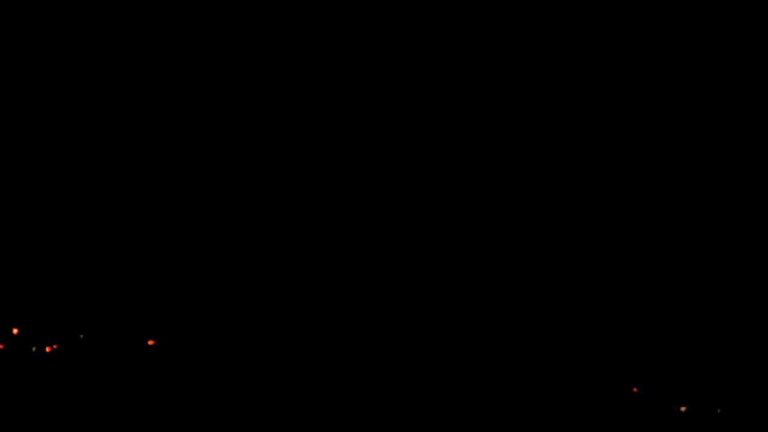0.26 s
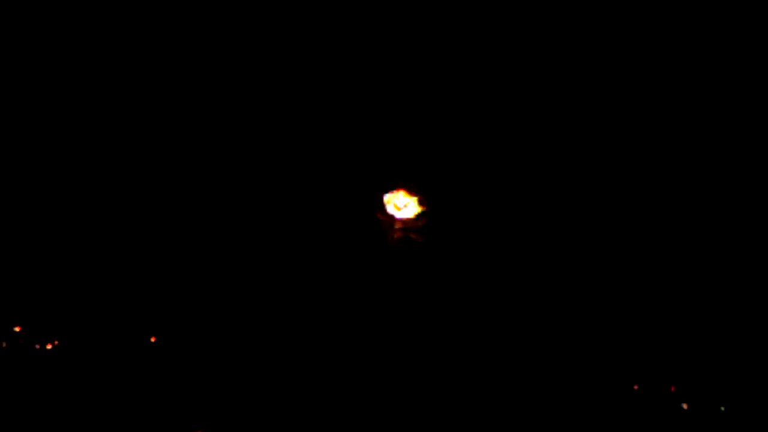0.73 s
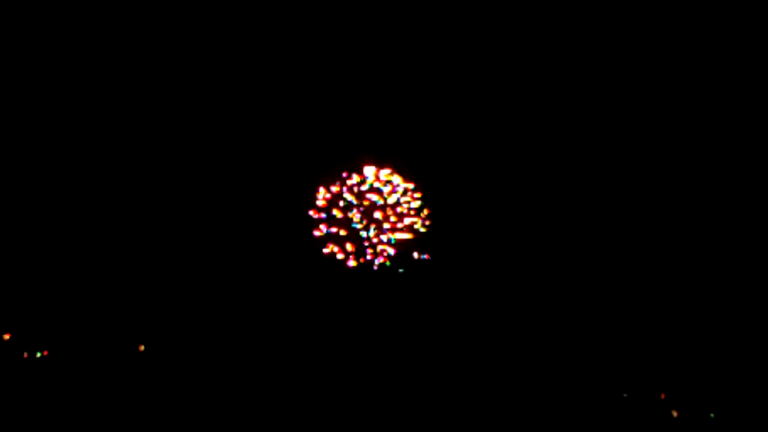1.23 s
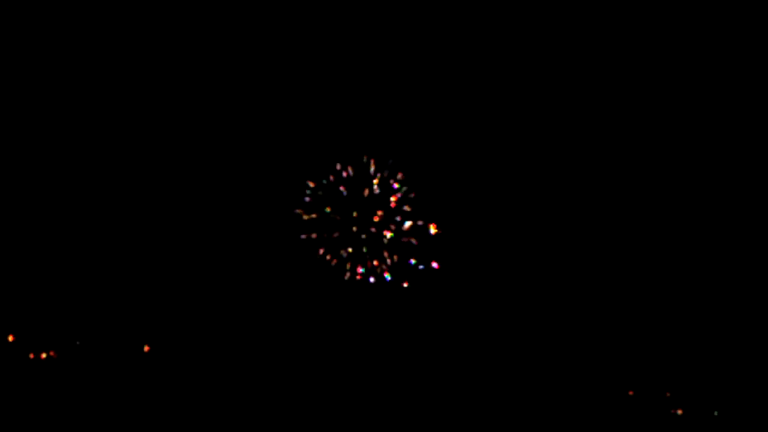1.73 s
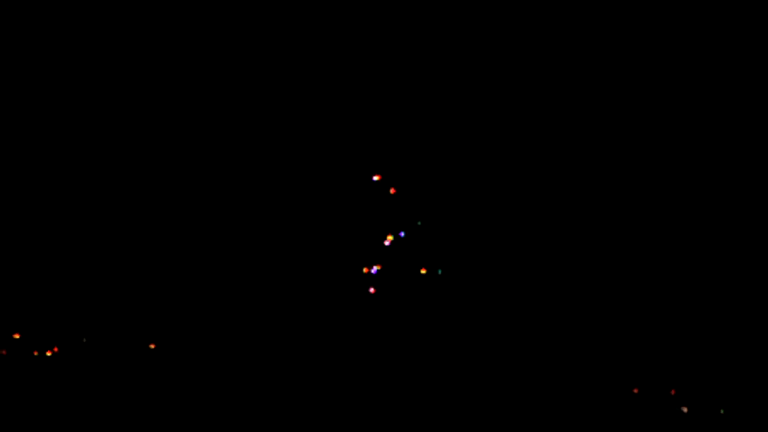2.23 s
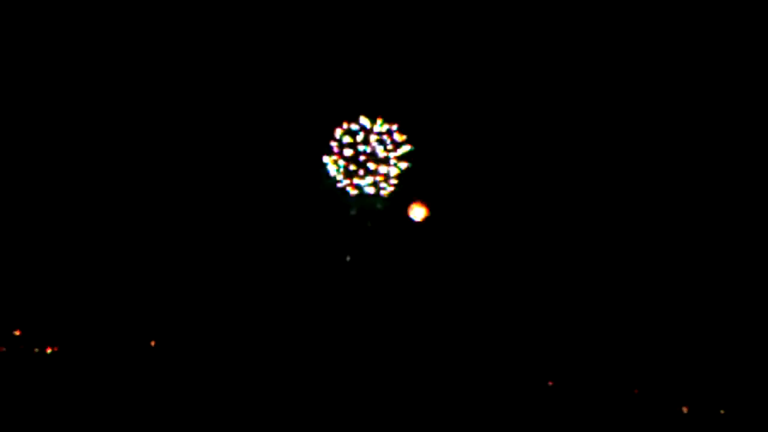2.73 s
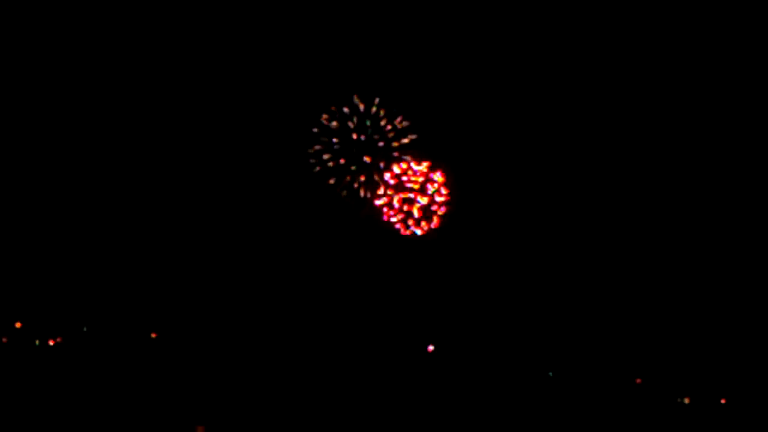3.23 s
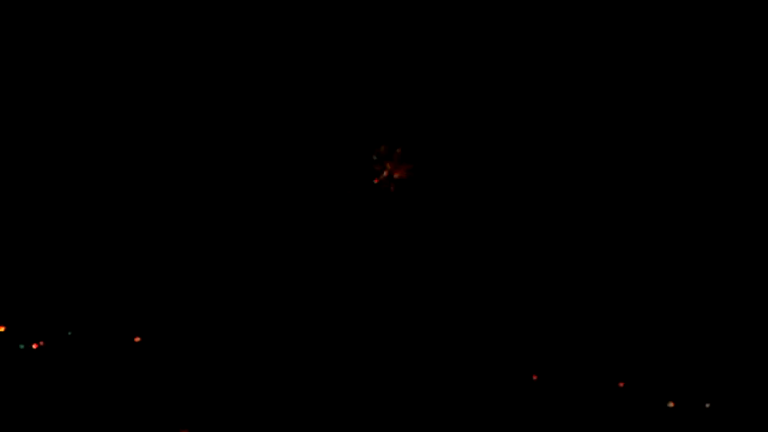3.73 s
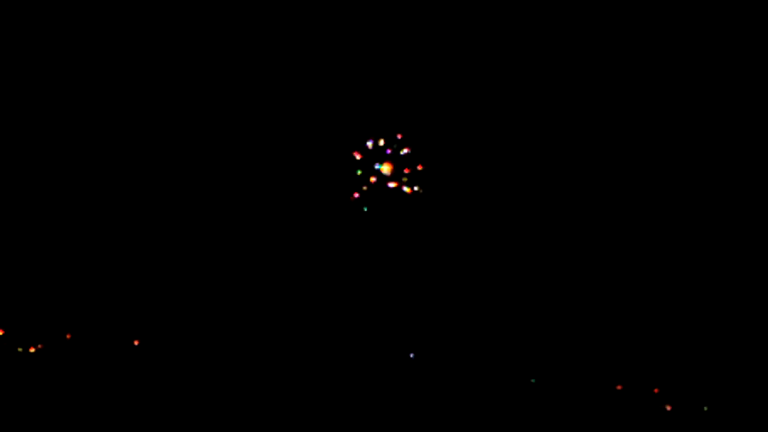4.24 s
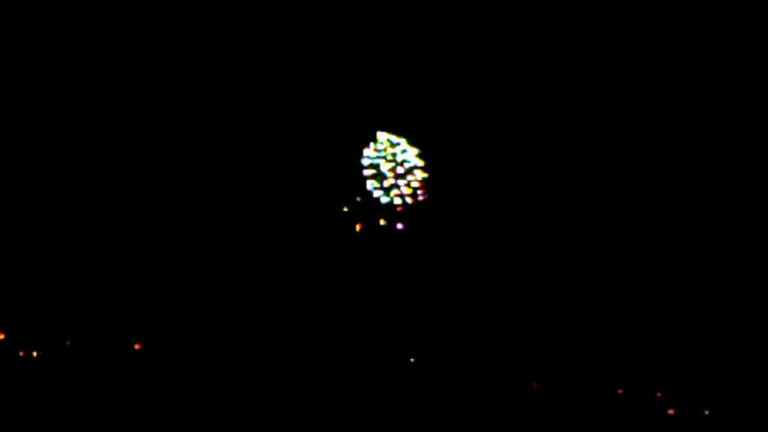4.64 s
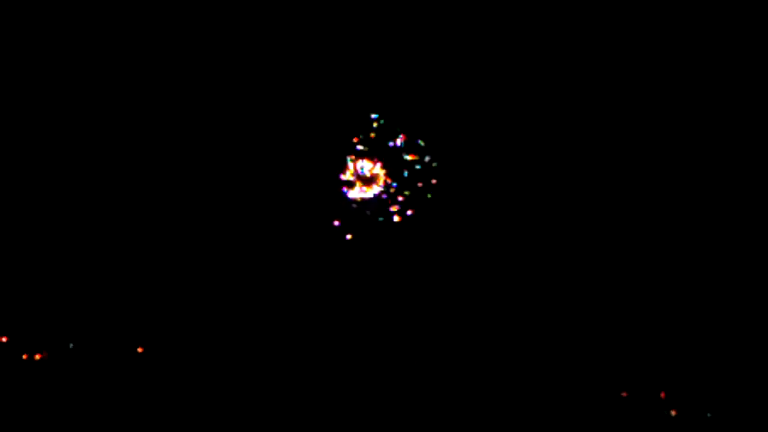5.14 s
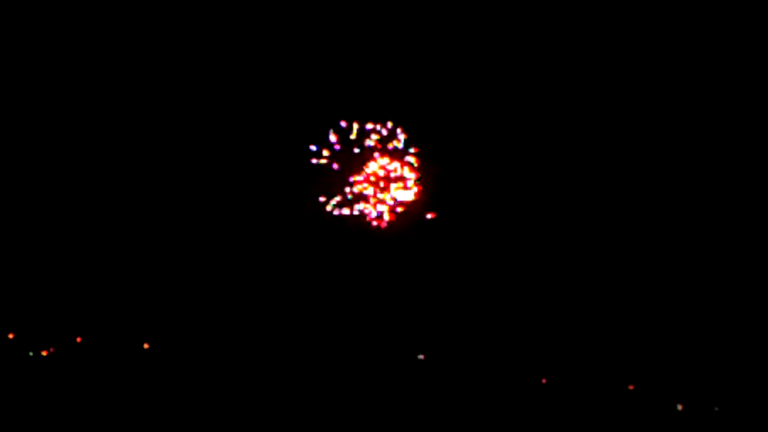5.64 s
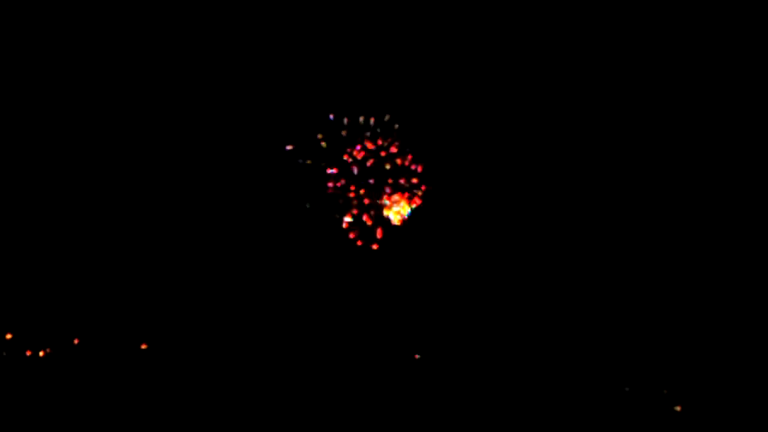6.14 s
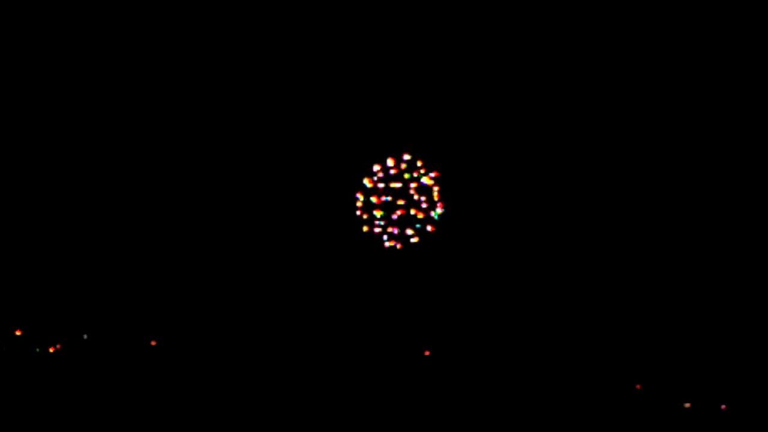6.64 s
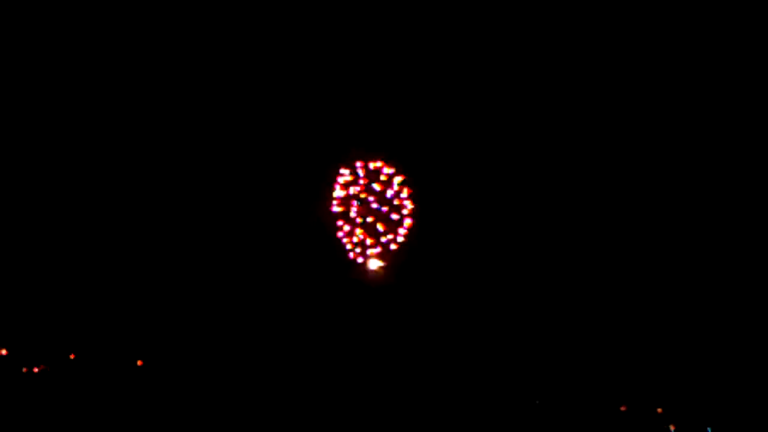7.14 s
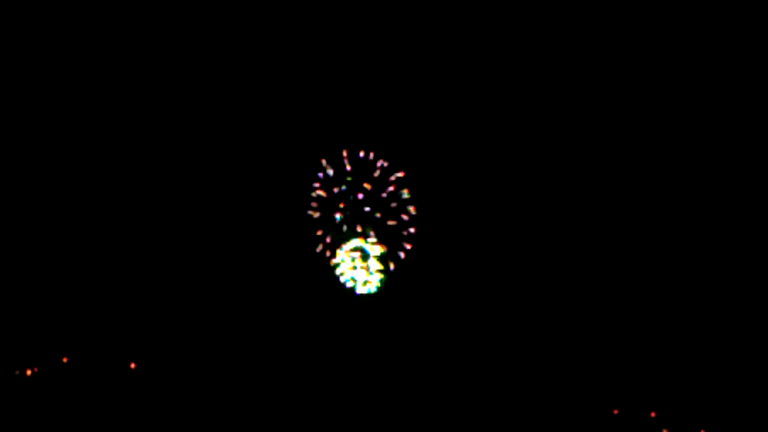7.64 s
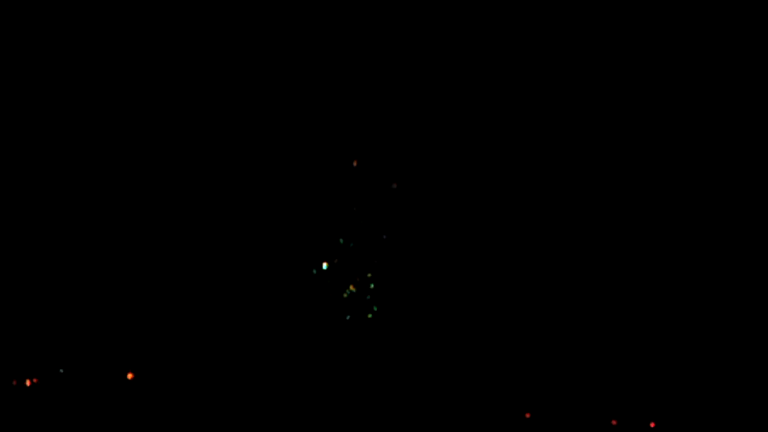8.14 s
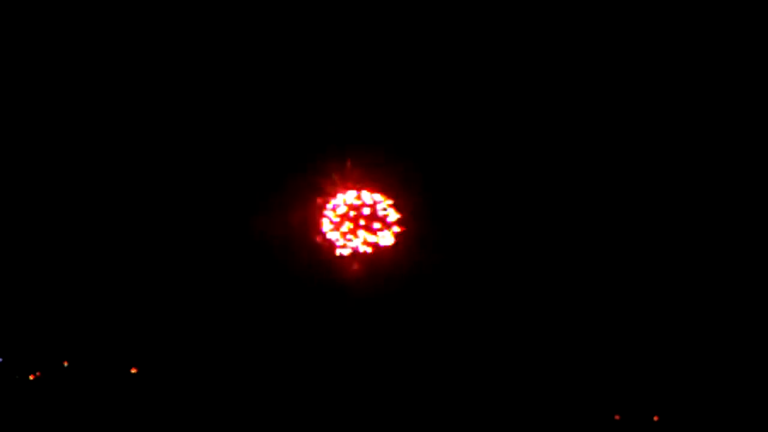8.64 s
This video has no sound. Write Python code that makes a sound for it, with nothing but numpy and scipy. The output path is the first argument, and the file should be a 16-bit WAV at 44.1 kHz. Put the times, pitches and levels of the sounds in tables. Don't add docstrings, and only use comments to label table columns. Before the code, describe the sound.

Aerial fireworks heard from far away across wide open land. Eleven bangs follow an opening rumble, some strong and bright, others duller and weaker, each bouncing off ground and walls before returning from distant faces. Soft sputtering showers come later. The small camera microphone gives steady hiss, faint high whine, gentle air buffeting, occasional clicks and flat distortion on the loudest blasts.

```python
import sys
import numpy as np
from scipy import signal
from scipy.fft import rfft, irfft, next_fast_len
from scipy.io import wavfile
from scipy.ndimage import uniform_filter1d

SR = 44100
rng = np.random.default_rng(int(sys.argv[2]) if len(sys.argv) > 2 else 0)


def put_to_file(sound):
    columns = np.atleast_2d(sound).T
    safe = np.clip(columns, -1, 1)
    whole_steps = np.round(safe * 32767)
    wavfile.write(sys.argv[1], SR, whole_steps.astype(np.int16))


def gain_from_db(level_db):
    decades = np.asarray(level_db, float) / 20
    return 10 ** decades


N = 391608

# delay in s, level in dB, favoured pitch in Hz,
# depth of the relief in ms, how strongly the pitch is favoured from 0 to 1.
FACES = [(0.117, -9.5, 420, 6.1, 0.9), (0.144, -15, 375, 5.7, 0.8), (.185, -17.5, 420, 11, 0.95),
         (0.23, -14.5, 730, 1.76, 0.6), (.497, -24.5, 465, 8.1, .8)]


def evened(x):
    return x / np.sqrt(np.mean(x ** 2) + 1e-20)


def read(points, hz):
    f, db = np.transpose(points)
    return np.interp(np.log(hz + 1), np.log(f + 1), db)


def add(mix, s, sound):
    at = round(s * SR)
    sound = sound[max(-at, 0):]
    part = mix[max(at, 0):][:len(sound)]
    part += sound[:len(part)]


def causal(points, tilt_db, size=2048):
    hz = abs(np.fft.fftfreq(8192, 1 / SR))
    db = read(points, hz) + tilt_db * np.log2((hz + 50) / 600)
    log_gain = np.log(gain_from_db(np.maximum(db, -100)))
    return np.fft.ifft(np.exp(np.conj(signal.hilbert(log_gain)))).real[:size]


def coloured(points, count):
    size = next_fast_len(count)
    z = rfft(rng.standard_normal(size)) * gain_from_db(read(points, np.fft.rfftfreq(size, 1 / SR)))
    return evened(irfft(z, size)[:count])


def drift(count, seconds):
    size = max(round(seconds * SR), 2)
    smooth = uniform_filter1d(rng.standard_normal(count), size)
    return evened(uniform_filter1d(smooth, size))


def hiss():
    # frequency in Hz, level in dB.
    hum_and_hiss = [(120, -37), (250, -6.5), (600, -24), (1400, -18.5), (1800, -21.5), (4000, -26),
                    (6000, -27.5), (10000, -27.5), (13800, -27), (14050, -68), (20000, -95)]
    return gain_from_db(-58.0 + 0.5 * drift(N, 0.0078)) * coloured(hum_and_hiss, N)


def breeze():
    # frequency in Hz, level in dB.
    air = [(15, -7), (25, -1), (60, -1), (110, -2), (150, -22), (300, -66), (1000, -99)]
    return gain_from_db(-63 + 1.3 * drift(N, 0.016)) * coloured(air, N)


def motor_whine():
    # pitch in Hz, level in dB.
    gear_lines = [(8555, -82), (8621, -76), (8687, -76), (8753, -83)]
    t = np.arange(N) / SR
    lines = np.zeros(N)
    for hz, db in gear_lines:
        lines += gain_from_db(db) * np.sin(2 * np.pi * (hz * t + 0.12 * drift(N, 0.02)))
    return gain_from_db(3 + 1.8 * drift(N, 0.06)) * lines


def puffs():
    puffs_per_s, puff_db, puff_ms = 14, -47.5, 3.6
    gaps, sizes = rng.random((2, 200))
    at = np.cumsum((0.28 + 1.6 * gaps) * SR / puffs_per_s).astype(int)
    inside = at < N
    train = np.zeros(N)
    train[at[inside]] = (0.23 + sizes ** 1.3)[inside]
    ms = np.arange(-1000, 1000) * 1000 / SR
    push = np.exp(-0.5 * (ms / puff_ms) ** 2)
    pushes = signal.oaconvolve(train, push, "same")
    return gain_from_db(puff_db) * signal.lfilter(*signal.butter(1, 12, "high", fs=SR), pushes)


def crackle():
    # pitch in Hz, bandwidth in Hz, level in dB.
    sputter = [(1346, 167, 15), (2985, 760, -2.8)]
    # middle in s, spread in s, level in dB.
    showers = [
        (4.3, 0.12, -57),
        (5.3, 0.52, -59),
        (6.3, 0.43, -59.5),
        (8.0, 0.42, -59),
    ]
    pops_per_s = 2500
    pops = rng.standard_normal(N) * (rng.random(N) < pops_per_s / SR)
    t = np.arange(900) / SR
    ring = np.zeros(len(t))
    for hz, width, db in sputter:
        swell_and_die = width * width * t * np.exp(-np.pi * width * t)
        ring += gain_from_db(db) * swell_and_die * np.sin(2 * np.pi * hz * t)
    swell = np.zeros(N)
    for middle, spread, db in showers:
        swell += gain_from_db(db) * np.exp(-0.5 * ((np.arange(N) / SR - middle) / spread) ** 2)
    clumps = gain_from_db(2.8 * drift(N, 0.075) + 1.5)
    return swell * clumps * evened(signal.oaconvolve(pops, ring)[:N])


def tick(s, db, hz, width, t60):
    t = np.arange(6000) / SR
    rough = signal.lfilter(*signal.butter(3, width / SR), rng.standard_normal(len(t)))
    rise = np.minimum(t / (0.096 * t60), 1) ** 2
    fall = gain_from_db(db - 60 * t / t60)
    return s, fall * rise * evened(rough) * np.sin(2 * np.pi * hz * t)


def reliefs():
    t_ms = np.arange(2000) * 1000 / SR
    for delay, db, hz, depth_ms, favour in FACES:
        relief = rng.standard_normal(len(t_ms)) * t_ms * np.exp(-2 * t_ms / depth_ms)
        colour = causal([(hz / 4, -14.0 * favour), (hz, 0.1), (hz * 0.98, -8.0 * favour),
                         (hz * 6, -22.0 * favour), (hz * 16, -60.0)], 0)
        face = np.convolve(relief, colour)
        yield delay, gain_from_db(db) * face * np.linalg.norm(colour) / np.linalg.norm(face)


def land(return_db, clutter_db):
    # frequency in Hz, level in dB.
    ground = [(60, 2.5), (300, 0), (900, -3), (1500, -6.5), (2500, -4.5), (6000, -14)]
    # frequency in Hz, level in dB.
    rumble = [(60, -11), (200, -4.5), (400, -4.5), (700, -6.5), (1100, -6.5), (1400, -11.5), (1700, -6.5),
              (2500, -10), (6000, -28)]
    t = np.arange(4 * SR) / SR
    late = 1 - np.exp(-t / 0.077)
    noise = rng.standard_normal(len(t))
    fresh = signal.oaconvolve(noise, causal(ground, 0))[:len(t)]
    dull = signal.oaconvolve(noise, causal(rumble, 0))[:len(t)]
    lumps_db = drift(len(t), 0.0064) + 1.79 * drift(len(t), 0.045)
    near = gain_from_db(-18 - 166 * t) * (t > 0.0023)
    behind = t - FACES[0][0]
    slope = gain_from_db(-30.5 - 107 * behind)
    roll = gain_from_db(-36 - 4 * t) / np.hypot(1, t / 0.65)
    beyond = np.clip(behind / 0.011, 0, 1) * np.hypot(slope, roll)
    level = np.hypot(near, beyond) * gain_from_db(lumps_db + clutter_db * (2 - late) + return_db * late)
    return 0.23 * level * ((1 - late) * fresh + late * dull)


def burst(s, row, faces):
    # frequency in Hz, level in dB.
    blast = [(35, -32), (80, -13), (160, -2.5), (300, 4), (600, 2.85), (900, -1), (1120, -6.5), (1350, -4),
             (1550, -19), (2300, -30.5), (3000, -52), (6000, -82), (9000, -105)]
    # delay in ms, signed strength.
    walls = [(2.9, -0.37), (4.75, 0.69), (6.9, 0.19), (8.3, 0.19), (10.0, -0.038), (20.5, -0.088),
             (24.0, 0.19)]
    db, tilt_db, rebound_ms, return_db = row
    clutter_db = -2
    near_faces, near_db, far_db = 3, -0.5 + 0.15 * return_db, -0.089 * return_db

    paths = np.zeros(SR)
    paths[0] = 1
    for ms, strength in walls:
        paths[round(ms * SR / 1000)] += strength * gain_from_db(clutter_db)
    for i, (delay, face) in enumerate(faces):
        add(paths, delay, gain_from_db(near_db if i < near_faces else far_db) * face)

    rebound = np.clip(0.59 / rebound_ms ** 2, 0.25, 0.8)
    count = np.arange(4)
    swings = np.zeros(800)
    swings[np.round(count * rebound_ms * SR / 1000).astype(int)] = (-rebound) ** count

    front = causal(blast, tilt_db)
    front = front / front.max()
    sound = signal.fftconvolve(land(return_db, clutter_db), front)
    add(sound, 0, signal.fftconvolve(paths, np.convolve(front, swings)))
    return s - front.argmax() / SR, gain_from_db(db) * sound


def scene():
    # start in s, level in dB, pitch in Hz, width in Hz, ring time (t60) in s.
    ticks = [
        (2.557, -33.5, 6000, 13000, 0.012),
        (3.304, -37, 1270, 149, 0.066),
        (4.274, -44, 3570, 2500, 0.15),
        (5.755, -43, 1960, 1200, 0.11),
        (7.544, -44, 7040, 1500, 0.016),
        (7.754, -32.5, 3900, 797, 0.023),
        (8.005, -47.5, 3200, 700, 0.26),
        (8.068, -39, 2450, 500, 0.028),
        (4.66, -49, 2980, 1500, 0.05),
    ]
    arrivals = [-.065, 1.7661, 2.2546, 3.7822, 3.9797, 4.1913, 5.8124, 6.0543, 6.7145, 7.6281, 8.4053,
                8.6891]
    # blast in dB, brightness in dB per octave, rebound delay in ms,
    # strength of the land's answer in dB.
    bursts = [(-5, 0, 1.47, 8.5), (4, 1.5, 2.6, -1.5), (-1.5, -0.5, 0.966, 3), (-3, 0.7, 1.52, 8.5),
              (-3, -0.5, 0.86, 6), (9.5, 3, 1.387, -4), (-3, -1, 0.936, 8), (-4, -0.5, 0.83, 2.5),
              (-6, 0.9, 1.4, 6), (-6, 1.7, 1.66, 8.5), (1, 3, 2.5, 1.5), (-8, -1.5, 1.01, 11)]
    mix = hiss() + breeze() + motor_whine() + crackle() + puffs()
    faces = list(reliefs())
    for s, row in zip(arrivals, bursts):
        add(mix, *burst(s, row, faces))
    for row in ticks:
        add(mix, *tick(*row))
    return mix[None]


def band_limit(x):
    return signal.sosfilt(signal.butter(12, 14940, fs=SR, output="sos"), x)


def record(dry):
    clip = 0.705
    return band_limit(np.clip(dry, -clip, clip))


dry = scene()
out = record(dry)
put_to_file(out)
```